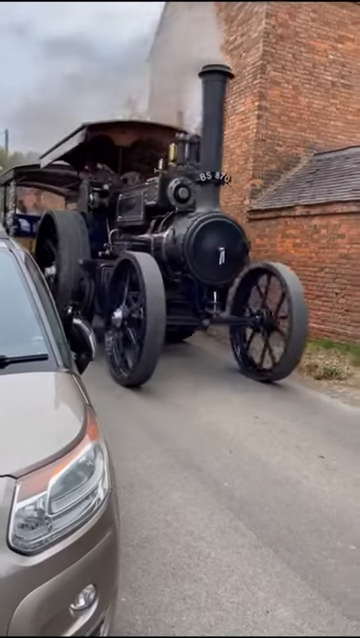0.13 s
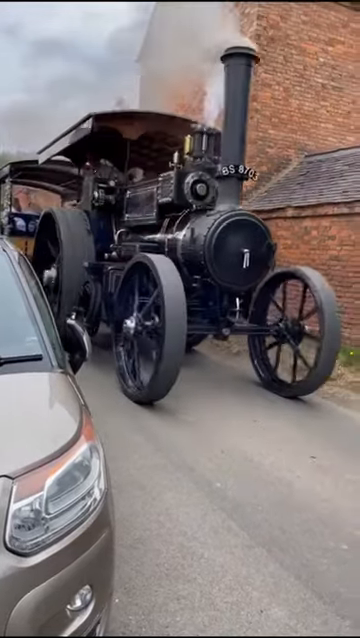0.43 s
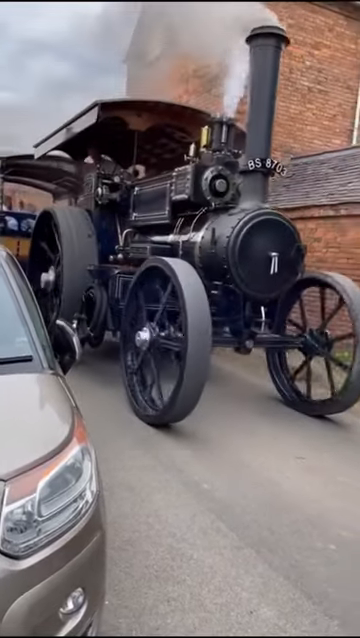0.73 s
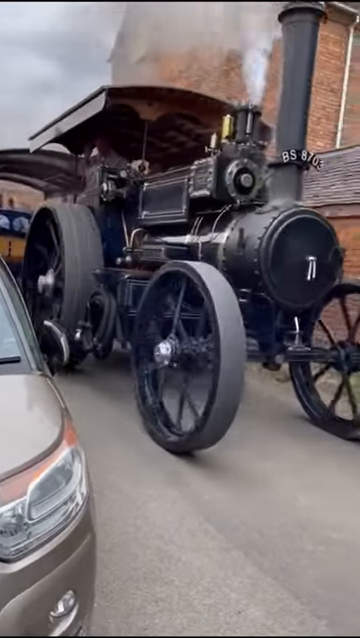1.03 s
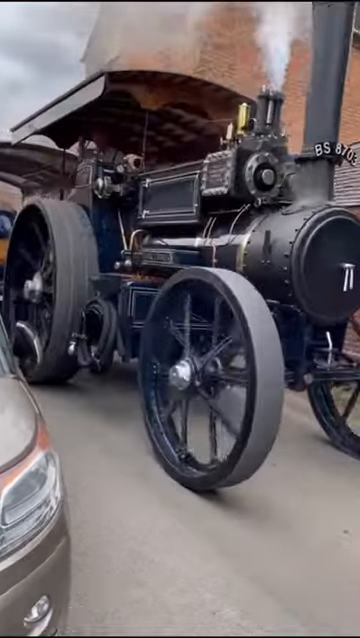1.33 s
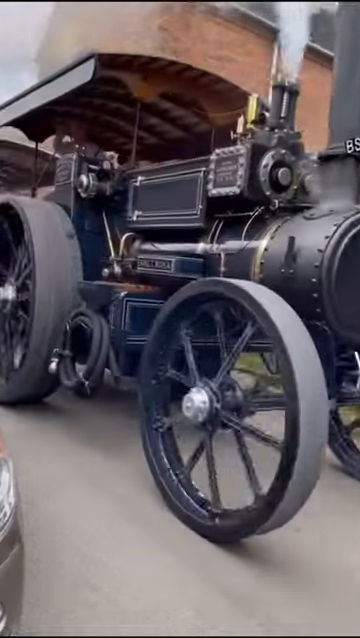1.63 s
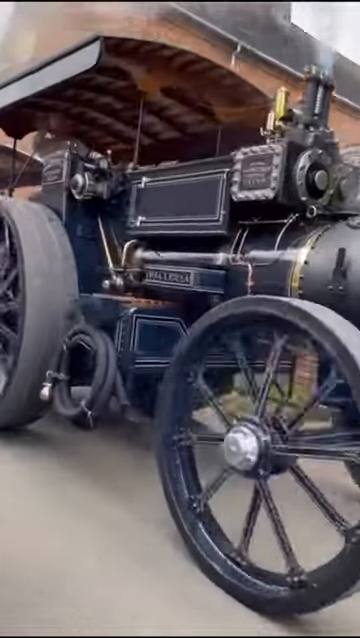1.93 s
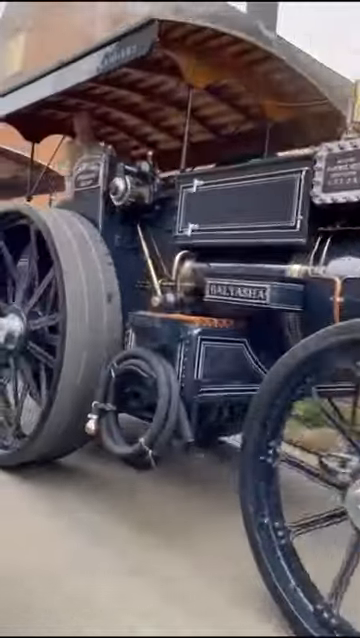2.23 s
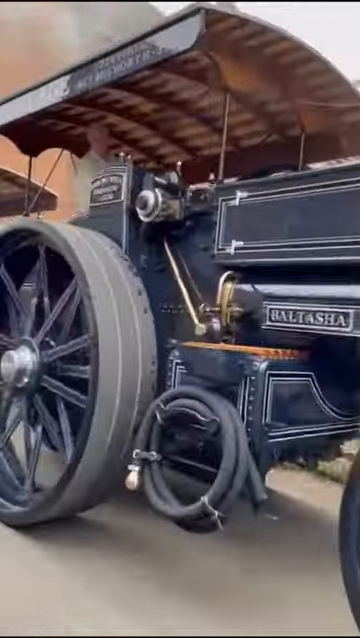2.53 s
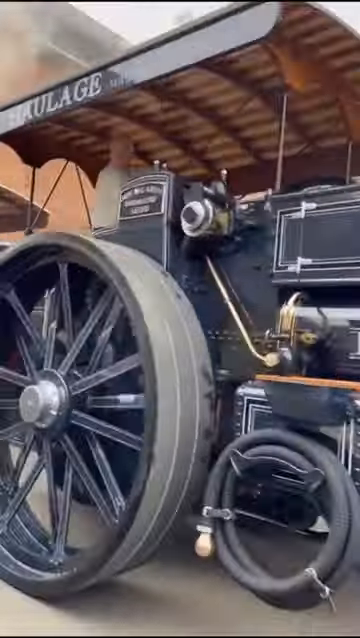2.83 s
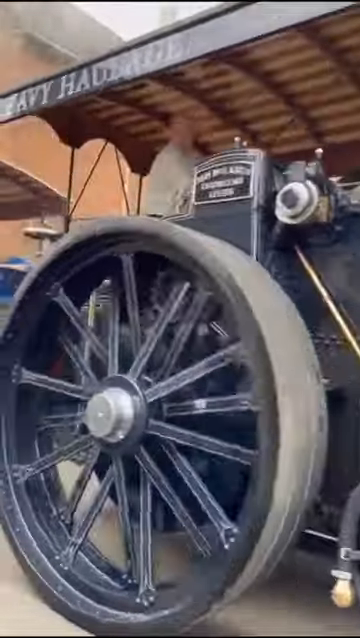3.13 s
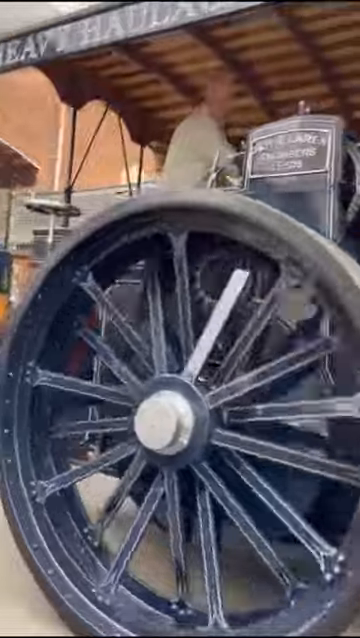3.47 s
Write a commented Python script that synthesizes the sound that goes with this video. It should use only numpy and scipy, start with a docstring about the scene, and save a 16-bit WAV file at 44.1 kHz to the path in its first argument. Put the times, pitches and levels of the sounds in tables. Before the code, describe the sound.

A steam traction engine chuffs, hisses and rumbles past close by on a street.

```python
"""A narrow brick street: a steam traction engine rolls up and passes close by.
Wheels rumble and gears ring, growing as the rear wheel draws level; slack rod bearings clack.
Leaking steam hisses throughout, with two breathy resonances. Road and walls reflect the sound.
The exhaust chuffs almost six times a second through the booming chimney,
with a short spit of steam between chuffs."""
import sys
import numpy as np
from scipy import signal
from scipy.fft import rfft, irfft
from scipy.io import wavfile
from scipy.ndimage import map_coordinates

SR = 44100
rng = np.random.default_rng(int(sys.argv[2]) if len(sys.argv) > 2 else 0)


def unload_audio(sound):
    """Save the sound as a 16-bit wav file, at the path given as the first command line argument."""
    columns = np.transpose(np.atleast_2d(sound))
    # keep every value between -1 and 1, then stretch to whole-number steps
    steps = np.round(np.clip(columns, -1, 1) * 32767)
    wavfile.write(sys.argv[1], SR, steps.astype(np.int16))


N = 158760
TIME_S, BIN_HZ = np.arange(N) / SR, np.fft.rfftfreq(N, 1 / SR)
SIDE_ON_S = 3.1  # engine fully side-on


def amp(db):
    """Decibels to gain."""
    return 10 ** (np.asarray(db) / 20)


def unit(x):
    """Scales to rms 1."""
    return x / np.sqrt(np.mean(x ** 2) + 1e-20)


def curve(points, column=1):
    """Interpolates rows (time_s, ...) over the scene."""
    rows = np.array(points)
    return np.interp(TIME_S, rows[:, 0], rows[:, column])


def colour(x, spectrum):
    """Filters by rows (freq_hz, gain_db)."""
    freq_hz, gain_db = np.transpose(spectrum)
    bin_hz = np.fft.rfftfreq(len(x), 1 / SR)
    return irfft(rfft(x) * amp(np.interp(np.log(bin_hz + 1), np.log(freq_hz), gain_db)), len(x))


def noise(spectrum, size=N):
    """Shaped noise, rms 1."""
    return unit(colour(rng.standard_normal(size), spectrum))


def wander(rate_hz, size=N):
    """Slow random motion, rms 1."""
    bin_hz = np.fft.rfftfreq(size, 1 / SR)
    return unit(irfft(rfft(rng.standard_normal(size)) * np.exp(-(bin_hz / rate_hz) ** 2), size))


def add(mix, start_s, sound):
    """Mixes a sound in at start_s."""
    part = mix[max(round(start_s * SR), 0):][:len(sound)]
    part += sound[:len(part)]


def burst(x, rise_s, length_s, fall_s):
    """Attack, hold, release; energy equals rms 1 over length_s + fall_s."""
    t = np.arange(len(x)) / SR
    attack = np.sin(np.pi / 2 * np.minimum(t / rise_s, 1)) ** 2
    release = np.exp(-np.maximum(t - length_s + fall_s / 2, 0) / fall_s)
    x = x * attack * release
    return x / np.sqrt(np.sum(x ** 2) / SR / (length_s + fall_s))


def decay(t, t60_s):
    """Falls 60 dB in t60_s."""
    return np.exp(-np.log(1000) * t / t60_s)


def rough_tone(pitch_hz, width_hz, rough, size=N):
    """A resonance whose pitch and strength stagger."""
    cycles = np.cumsum(pitch_hz + width_hz / 2 * wander(34.3, size)) / SR + rng.random()
    return np.sin(2 * np.pi * cycles) * (1 + rough * wander(30, size))


def struck_mode(hits, pitch_hz, t60_s, size):
    """One damped mode, struck with random force at each hit."""
    t = np.arange(size) / SR
    ring = decay(t, t60_s) * np.sin(2 * np.pi * pitch_hz * t)
    return signal.oaconvolve(hits * rng.standard_normal(N), ring)[:N]


def street(x, tail_db=-5, t60_s=.45, echoes_per_s=1500, gap_s=.012):
    """The brick walls throw back a short tail."""
    t = np.arange(SR // 2) / SR
    echoes = rng.standard_normal(len(t)) * (rng.random(len(t)) < echoes_per_s / SR)
    echoes *= (t > gap_s) * decay(t, t60_s)
    return x + amp(tail_db) * signal.oaconvolve(x, echoes / np.linalg.norm(echoes))[:N]


# time_s, lag_s
ROAD_LAG = [(0, .0038), (.3, .0039), (.68, .0044), (1, .0048), (1.8, .0059), (3.6, .0067)]


def road_echo(x, start_gain=.34, fade_s=2.5):
    """The road reflection lags more as the engine nears, sweeping a comb of peaks downward."""
    gain = start_gain * np.exp(-TIME_S / fade_s)
    echo = map_coordinates(x, [(TIME_S - curve(ROAD_LAG)) * SR], order=3, mode="reflect")
    return (x + gain * echo) / np.sqrt(1 + gain ** 2)


def midrange_dapple(x, depth_db=2.6, patch_hz=32, patch_s=.06, low_hz=500, top_hz=4500):
    """Random drifting peaks and hollows dapple the midrange."""
    frames = dict(fs=SR, nperseg=2048, noverlap=1536)
    hz, t, spectra = signal.stft(x, **frames)
    across, along = np.fft.fftfreq(len(hz), hz[1])[:, None], np.fft.fftfreq(len(t), t[1])
    blur = abs(across) * np.exp(-2 * np.pi ** 2 * ((across * patch_hz) ** 2 + (along * patch_s) ** 2))
    patches = unit(np.fft.ifft2(np.fft.fft2(rng.standard_normal(spectra.shape)) * blur).real)
    midrange = np.minimum(hz / low_hz, 1) / (1 + (hz / top_hz) ** 2)
    gain = amp(depth_db * midrange[:, None] * patches)
    gain /= np.sqrt(np.mean(gain ** 2, axis=1, keepdims=True))
    return signal.istft(spectra * gain, **frames)[1][:N]


# Rumble spectra: freq_hz, gain_db
ROLL_SPECTRUM = [(15, -31), (35, -10.5), (65, 2), (110, 4), (180, 0.5), (270, 1.5), (480, -8), (750, -6.5),
                 (1200, -15.5), (2500, -17), (6000, -71)]
REAR_SPECTRUM = [(15, -34), (36, 2), (65, 19), (110, -7), (300, -50)]
# time_s, level_db
ROLL_LEVELS = [(0, -22.5), (.4, -24), (.75, -25.5), (1.2, -24), (1.8, -26), (2.3, -23), (2.7, -24),
               (3.2, -22.5), (3.6, -25.5)]


def wheels(lump_db=2, lump_rate_hz=18, bass_hz=160, rear_pass_s=3.4, rear_span_s=.43):
    """Heavy wheels rumble on tarmac: lumpy in the bass, deepest beside the rear wheel."""
    roll = noise(ROLL_SPECTRUM)
    bass = irfft(rfft(roll) / (1 + (BIN_HZ / bass_hz) ** 4), N)
    roll = roll - bass + bass * amp(lump_db * wander(lump_rate_hz))
    rear_gain = amp(-23) / (1.5 + ((TIME_S - rear_pass_s) / rear_span_s) ** 2)
    return roll * amp(curve(ROLL_LEVELS)) + rear_gain * noise(REAR_SPECTRUM)


# pitch_hz, gain_db, t60_s
GEAR_RESONANCES = [(228.3, -3, 0.22), (341, -3.5, 0.22), (371, -2, 0.13), (439.4, -3.5, 0.19),
                   (514.5, -4, 0.19), (577, -10, 0.11), (683, -9.5, 0.043), (874, -22, 0.033),
                   (1180, -0.5, 0.052), (1610, -36, 0.034)]
# time_s, level_db
GEAR_LEVELS = [(0, -36.5), (1.5, -41.5), (2.4, -36), (2.9, -33), (3.3, -29.5), (3.6, -33.5)]


def gears(knocks_per_s=130, accent_db=0):
    """Teeth and loose links knock at random and ring the iron gearing."""
    knocks = rng.random(N) < knocks_per_s / SR
    knocks = knocks * amp(accent_db * np.minimum(rng.exponential(1, N), 2))  # no accents at 0 dB
    out = np.zeros(N)
    for pitch_hz, gain_db, t60_s in GEAR_RESONANCES:
        out += amp(gain_db) * unit(struck_mode(knocks, pitch_hz, t60_s, SR // 2))
    return unit(out) * amp(curve(GEAR_LEVELS))


# pitch_hz, gain_db, t60_s
ROD_RESONANCES = [(517, -3, 0.11), (634, 1, 0.064), (760, -1, 0.075), (830, -4, 0.073), (928, -2, 0.083),
                  (1080, -3.5, 0.1), (1250, -5, 0.06), (1390, -7, 0.059), (1640, -9, .07), (2154, -4, .06)]
# time_s, level_db
RATTLE_LEVELS = [(0, -44), (.9, -37.5), (1.3, -38), (2.1, -36.5), (2.6, -44), (3.6, -49)]
# start_s, level_db
BEARING_CLACKS = [(0.002,-26), (.828,-29.5), (1.25,-30), (1.70,-30.5), (1.768,-30.5), (1.94,-32),
                  (2.73,-30), (2.97,-33), (3.452,-32)]


def rods(taps_per_s=70, detune=.05):
    """Slack rod bearings clack over a light rattle that peaks as the cylinders pass."""
    t, clacks, rattle = np.arange(SR // 4) / SR, np.zeros(N), np.zeros(N)
    taps = rng.random(N) < taps_per_s / SR
    for pitch_hz, gain_db, t60_s in ROD_RESONANCES:
        rattle += amp(gain_db) * struck_mode(taps, pitch_hz, t60_s, len(t))
    for start_s, level_db in BEARING_CLACKS:
        ring = np.zeros(len(t))
        for pitch_hz, gain_db, t60_s in ROD_RESONANCES:
            detuned_hz = pitch_hz * (1 + detune * rng.uniform(-1, 1))
            tone = rough_tone(detuned_hz, width_hz=8.9, rough=.3, size=len(t))
            ring += amp(gain_db) * decay(t, t60_s) * tone
        add(clacks, start_s, amp(level_db) * burst(ring, rise_s=.005, length_s=.02, fall_s=.025))
    return clacks + unit(rattle) * amp(curve(RATTLE_LEVELS))


# start_s, length_s, pitch_hz, level_db
BODY_NOTES = [(0, .025, 275, -26), (.16, .075, 260, -25), (.325, .045, 277, -28.5), (.585, .03, 265, -29),
              (.865, .07, 275, -29), (1.25, .11, 282, -30), (1.54, .05, 308, -30), (1.76, .05, 232, -28),
              (2.025, .05, 305, -26), (2.14, .1, 392, -32), (2.21, .04, 230, -25), (2.56, .11, 218, -23.5),
              (2.72, .05, 442, -27), (2.725, .04, 230, -26), (2.88, .09, 220, -29), (2.92, .08, 332, -30),
              (3.12, .17, 430, -28.5), (3.27, .05, 222, -23), (3.412, .06, 377, -24)]


def iron_body():
    """The iron body rings with short hollow notes."""
    out = np.zeros(N)
    for start_s, length_s, pitch_hz, level_db in BODY_NOTES:
        tone = rough_tone(pitch_hz, width_hz=8.9, rough=.12, size=SR // 2)
        add(out, start_s, amp(level_db) * burst(tone, rise_s=.0066, length_s=length_s, fall_s=.043))
    return out


# time_s, lower_db, upper_db
WHISTLE_LEVELS = [(0, -49, -35), (.9, -44, -34.5), (1.5, -34, -34), (2.2, -34.5, -39), (2.55, -34, -35),
                  (3.1, -36, -39), (3.6, -47, -40)]


def leak_whistles(pitches_hz=(3790, 5210), width_hz=170, drift_hz=75, swell_db=2):
    """Two breathy resonances of the leak drift in pitch, swell and fade."""
    out = np.zeros(N)
    for column, pitch_hz in enumerate(pitches_hz, 1):
        phase = 2 * np.pi * np.cumsum(pitch_hz + drift_hz * wander(rate_hz=4)) / SR
        breath = unit(wander(width_hz) * np.cos(phase) + wander(width_hz) * np.sin(phase))
        out += breath * amp(curve(WHISTLE_LEVELS, column) + swell_db * wander(rate_hz=6))
    return out


# Jet spectra: freq_hz, gain_db
LEAK_AHEAD = [(300, -13.5), (800, -8), (1350, -6.5), (1800, -3), (2400, -6), (2900, -12), (3300, -12),
              (3750, -4.5), (4100, -3.5), (4500, -1), (5250, -0.5), (6200, -5.5), (9000, -4), (10200, -0.5),
              (11600, -4)]
LEAK_SIDE = [(300, -3), (800, -7), (1350, -4.5), (1800, -6.5), (2400, -3.5), (2900, -7.5), (3300, -3.5),
             (3750, 1.5), (4100, 0), (4500, -2.5), (5250, 2), (6100, -3.5), (6700, -17.5), (8600, -28),
             (9200, -3.5), (10200, 0.5), (11600, -3.5)]
# time_s, hiss_gain_db, fizz_gain_db
LEAK_GAINS = [(0, -19.8, -22), (.09, -18.8, -20.3), (.2, -21, -23.5), (.33, -21, -22.5),
              (.48, -20.3, -21.5), (.62, -21.3, -23.5), (.78, -22.5, -25), (.97, -21.3, -23.3),
              (1.09, -22.3, -24.5), (1.25, -21.8, -22.7), (1.41, -22.4, -24.3), (1.56, -22.3, -23.6),
              (1.82, -24.2, -24.3), (2.18, -24.5, -25), (2.38, -24.8, -25.5), (2.52, -23.5, -24.8),
              (2.63, -24.2, -26.3), (2.76, -23.2, -25.3), (2.9, -25, -26), (3.3, -25, -26.3),
              (3.6, -25.8, -27.4)]


def leak(hiss_db=1.5, fizz_db=2, split_hz=7800, flutter_hz=42, hiss_flutter_db=.5, fizz_flutter_db=1.09):
    """A fluttering steam jet, hiss below and fizz on top, changes colour as the engine turns side-on."""
    side = np.clip(TIME_S / SIDE_ON_S, 0, 1)
    jet = np.sqrt(1 - side) * noise(LEAK_AHEAD) + np.sqrt(side) * noise(LEAK_SIDE)
    top = irfft(rfft(jet) * (BIN_HZ > split_hz), N)
    fizz = unit(top) * amp(fizz_db + curve(LEAK_GAINS, 2) + fizz_flutter_db * wander(flutter_hz))
    hiss = unit(jet - top) * amp(hiss_db + curve(LEAK_GAINS) + hiss_flutter_db * wander(flutter_hz))
    return hiss + fizz


# freq_hz, gain_db
SPIT_SPECTRUM = [(500, -21), (900, -5), (1250, 4.5), (1700, 11), (2400, 10.5), (3000, 3), (5500, -13),
                 (9000, -45)]
# start_s, gain_db
STEAM_SPITS = [(.088,-30), (.255,-32), (.42,-28), (.584,-29.5), (.756,-31), (.927,-33), (1.089,-32),
               (1.26,-30.5), (1.432,-28.5), (1.604,-35), (1.782,-28.5), (1.951,-33), (2.125,-33),
               (2.286,-29.5), (2.464,-31.5), (2.635,-36), (2.807,-31), (2.978,-30), (3.156,-37),
               (3.345,-35), (3.509,-31.5)]


def spits(base_db=1.5):
    """A brief, bright spit of steam on every stroke."""
    out = np.zeros(N)
    for start_s, gain_db in STEAM_SPITS:
        spit = burst(noise(SPIT_SPECTRUM, SR // 10), rise_s=.006, length_s=.024, fall_s=.022)
        add(out, start_s, amp(base_db + gain_db) * spit)
    return out


# Spectra of steam rushing up the chimney: freq_hz, gain_db
RUSH_AHEAD = [(100, -23), (195, -30), (235, 1), (278, 3), (320, -4.5), (385, -4.5), (500, -13.5),
              (800, -9.5), (1300, -33), (4000, -33)]
RUSH_SIDE = [(100, -23), (180, -11.5), (218, -4), (260, -4), (320, -3.5), (385, 0), (500, -10.5),
             (800, -20.5), (1300, -32), (4000, -56)]
# start_s, length_s, thump_db, tone_db, rush_db
EXHAUST_CHUFFS = [(0.0,0.069,-54,-23.5,-33.5), (0.151,0.085,-23,-29,-28), (0.328,0.05,-28,-26,-24),
                  (0.492,0.095,-31,-26,-29), (0.67,0.059,-47,-35,-50), (0.844,0.097,-33,-30,-24),
                  (1.027,0.14,-29,-27,-27), (1.202,0.12,-25.5,-26.5,-29.5), (1.369,0.035,-25.5,-25.5,-31.5),
                  (1.515,0.06,-21.5,-20,-26), (1.694,0.064,-27,-24,-30.5), (1.863,0.092,-35,-23,-26),
                  (2.029,0.16,-41,-27.5,-30.5), (2.208,0.052,-37,-18.5,-30), (2.374,0.1,-29,-23,-27),
                  (2.547,0.095,-30,-18.5,-26), (2.717,0.062,-21,-23,-29.5), (2.893,0.081,-35,-22.5,-30.5),
                  (3.074,0.12,-30,-21.5,-30), (3.24,0.093,-28,-22,-22.5), (3.418,0.061,-24,-27,-23.5)]


def exhaust(thump_hz=72.7, chimney_hz=135, overtone_hz=226, overtone_db=-6, rise_s=.009, fall_s=.02):
    """Each chuff thumps, blows the chimney's resonances with turbulent steam and rushes out on top."""
    thump_power, tone_power, rush = np.zeros((3, N))
    flat = np.ones(SR // 2)
    for start_s, length_s, thump_db, tone_db, rush_db in EXHAUST_CHUFFS:
        pulse = burst(flat, rise_s, .64 * length_s, fall_s)
        add(thump_power, start_s, (amp(thump_db) * pulse) ** 2)
        swell = burst(flat, rise_s=.028, length_s=length_s, fall_s=.038)
        add(tone_power, start_s, (amp(tone_db) * swell) ** 2)
        side = min(start_s / SIDE_ON_S, 1) ** 2
        steam = np.sqrt(1 - side) * noise(RUSH_AHEAD, len(flat))
        steam += np.sqrt(side) * noise(RUSH_SIDE, len(flat))
        add(rush, start_s, amp(rush_db) * burst(steam, rise_s, length_s, fall_s))
    chimney = unit(rough_tone(chimney_hz, width_hz=9, rough=.2))
    overtone = unit(rough_tone(overtone_hz, width_hz=9, rough=.22))
    chimney += np.clip(TIME_S / SIDE_ON_S, 0, 1) ** 2 * amp(overtone_db) * overtone
    thump = unit(rough_tone(thump_hz, width_hz=14.2, rough=.25))
    return np.sqrt(thump_power) * thump + np.sqrt(tone_power) * chimney + street(rush)


def scene():
    """The engine in the street, mono."""
    engine = exhaust() + iron_body() + leak_whistles()
    machinery = street(gears() + rods())
    steam = road_echo(leak() + spits())
    return (engine + midrange_dapple(machinery + steam + wheels()))[None]


# freq_hz, gain_db
TREBLE_NOTCH_EQ = [(20, -2.5), (6350, -1), (6800, -8.5), (7050, -63), (8300, -64), (8600, -10.5), (9100, 2),
                   (11600, 3)]


def record(dry, cutoff_hz=11850):
    """Overall tone colour with a deep gap at 7-8.5 kHz, then a low-pass."""
    lowpass = signal.firwin(401, cutoff_hz, window=("kaiser", 9), fs=SR)
    return np.array([signal.oaconvolve(colour(x, TREBLE_NOTCH_EQ), lowpass, "same") for x in dry])


dry = scene()
out = record(dry)
unload_audio(out)
```